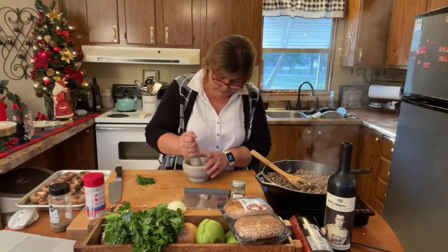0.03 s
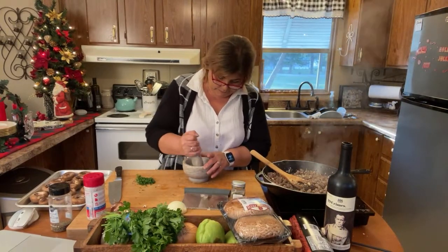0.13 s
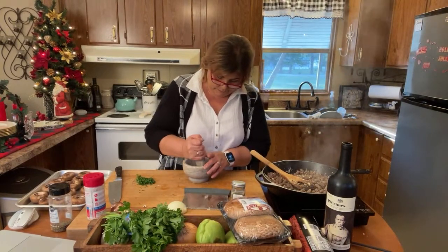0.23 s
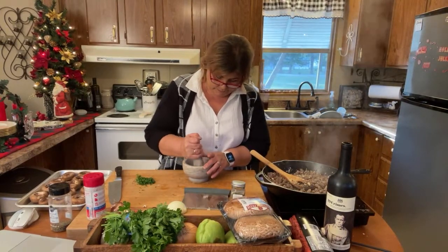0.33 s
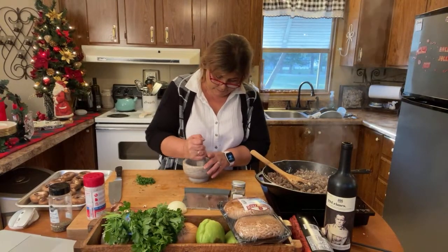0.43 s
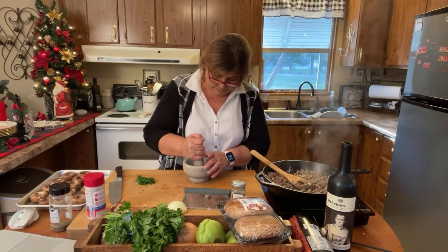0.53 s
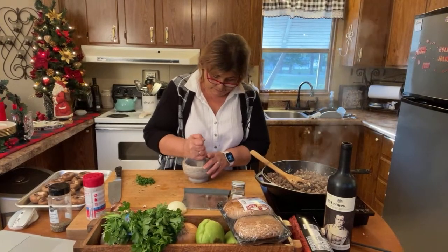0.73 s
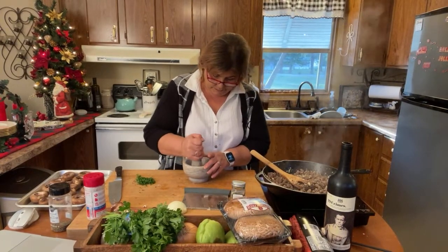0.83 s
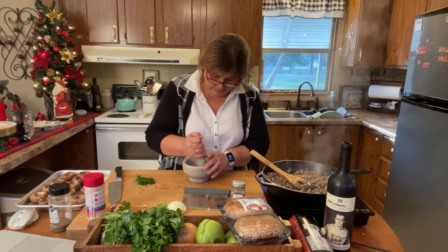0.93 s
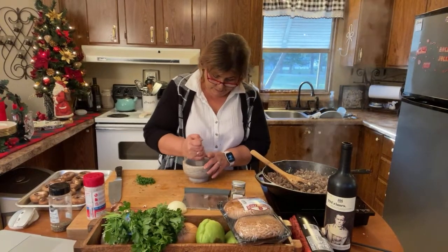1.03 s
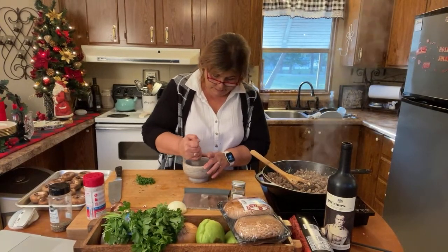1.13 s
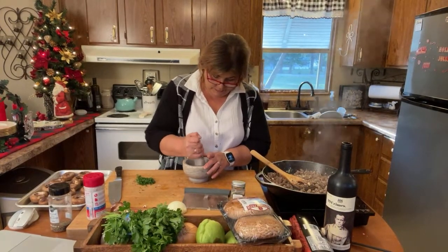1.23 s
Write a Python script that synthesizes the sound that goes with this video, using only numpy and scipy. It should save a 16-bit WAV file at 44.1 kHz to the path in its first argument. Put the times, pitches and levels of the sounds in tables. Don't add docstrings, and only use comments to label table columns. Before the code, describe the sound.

Four hard pestle knocks in a stone mortar on a wooden board, over faint kitchen hiss

```python
import sys
import numpy as np
from scipy import signal
from scipy.fft import rfft, irfft
from scipy.io import wavfile
from scipy.ndimage import uniform_filter1d

SR = 44100
rng = np.random.default_rng(int(sys.argv[2]) if len(sys.argv) > 2 else 0)


def wav_out(sig):
    wavfile.write(sys.argv[1], SR, np.round(np.clip(np.atleast_2d(sig).T, -1, 1) * 32767).astype(np.int16))


def volts_from_decibels(level):
    exponent = np.asarray(level, float) / 20
    return 10 ** exponent


N = 57330
BLOW_SAMPLES = 8000


def evened(x):
    return x / np.sqrt(np.mean(x ** 2) + 1e-20)


def read(points, hz):
    f, value = np.transpose(points)
    return np.interp(np.log(hz + 1), np.log(f + 1), value)


def add(mix, s, sound):
    part = mix[round(s * SR):][:len(sound)]
    part += sound[:len(part)]


def colour(x, points):
    gain = volts_from_decibels(read(points, np.fft.rfftfreq(len(x), 1 / SR)))
    return irfft(rfft(x) * gain, len(x))


def hiss():
    # (frequency [Hz], density [dB per Hz])
    hiss_spectrum = [(15, -52), (25, -7.5), (65, 6.5), (259, -8.5), (378, -7), (687, -8), (979, -7.5),
                     (13300, -27.5), (16500, -37)]
    frames = N // 256 + 5
    hz = np.fft.rfftfreq(1024, 1 / SR)
    real, imag, patches = rng.standard_normal((frames, 513, 3)).T
    patches = uniform_filter1d(patches, size=12, axis=0)
    patches_db = evened(uniform_filter1d(patches, size=12, axis=1))
    z = (real + 1j * imag) * volts_from_decibels(read(hiss_spectrum, hz)[:, None] + patches_db)
    return volts_from_decibels(-44) * evened(signal.istft(z, nperseg=1024, noverlap=768)[1][:N])


def hum():
    # (frequency [Hz], bandwidth [Hz], level [dB])
    hum_bands = [(80.6, 8.6, -49), (150, 52, -50), (241.7, 34, -55.5)]
    f = np.fft.rfftfreq(N, 1 / SR)
    out = np.zeros(N)
    for mid_hz, width_hz, db in hum_bands:
        resonance = 1 / (1 + (2 * (f - mid_hz) / width_hz) ** 2)
        out += volts_from_decibels(db) * evened(irfft(rfft(rng.standard_normal(N)) * resonance, N))
    return out


def contact_push(force_db, contact_ms):
    u = np.arange(300) / SR * 1000 / contact_ms
    push = u ** 11 * np.exp(-u * 6 * np.pi)
    return volts_from_decibels(force_db) * push / push.sum()


def ring(modes, spot):
    t = np.arange(BLOW_SAMPLES) / SR
    hz, db, t60 = np.transpose(modes)[:, :, None]
    spot_db = spot[:len(modes), None]
    swell = 1 - np.exp(-t * hz / 0.8)
    decay = volts_from_decibels(db + spot_db - 60 * t / t60)
    return (swell * decay * np.sin(2 * np.pi * hz * t)).sum(0)


def wood_thump(counter_db, spot):
    # (frequency [Hz], level [dB], t60 [s])
    board = [(224.3, -8, 0.064), (303.6, -8.5, 0.057), (401, -6, 0.09), (464, -6, .06), (555, -19, 0.023),
             (564.3, 5, 0.028), (601, -3, 0.095), (760, -5, 0.014), (902, -5.5, 0.053), (1240, 4, 0.017)]
    # (frequency [Hz], level [dB], t60 [s])
    seat = [(1570, 4, 0.019), (1760, -2, 0.03), (1892, 4, .016), (2426, 1, 0.024), (2560, 8, 0.0064),
            (3130, -59, 0.034), (3325, -6, 0.036), (3770, -26, 0.01)]
    # (frequency [Hz], level [dB], t60 [s])
    cabinet = [(148, -7.5, 0.15)]
    # (frequency [Hz], level [dB], t60 [s])
    bend = [(195.4, -20.5, 0.26), (216.4, -12, 0.15)]
    wood = volts_from_decibels(0.5) * ring(board, spot[0]) + volts_from_decibels(-1) * ring(seat, spot[1])
    return wood + volts_from_decibels(counter_db) * ring(cabinet, spot[0]) + volts_from_decibels(-counter_db) * ring(bend, spot[1])


def bowl_ring(spot):
    # (frequency [Hz], level [dB], t60 [s])
    bowl = [(5066, -2, 0.13), (5119, 1.5, 0.17), (4960, -8.5, 0.15), (5500, -40, 0.012),
            (10030, -26.5, 0.059), (10470, -17.5, 0.032), (13250, -48, .08)]
    return volts_from_decibels(-9.5) * ring(bowl, spot[2])


def causal(points):
    log_gain = np.log(volts_from_decibels(read(points, abs(np.fft.fftfreq(4096, 1 / SR)))))
    return np.fft.ifft(np.exp(np.conj(signal.hilbert(log_gain)))).real[:2048]


def crack_and_snap(grit):
    # (frequency [Hz], level [dB])
    crack_spectrum = [(100, -7), (300, 3.5), (600, 7.5), (1100, 0.5), (2200, 1.5), (3500, -8.5),
                      (4600, -12), (7000, -39)]
    crack_db, crack_t60, rise_s = 2.5, 0.033, 0.00015
    t = np.arange(BLOW_SAMPLES) / SR
    fade = np.minimum(t / rise_s, 1) * volts_from_decibels(crack_db - 60 * t / crack_t60)
    crack = fade * evened(colour(grit, crack_spectrum))
    snap = volts_from_decibels(26.5) * np.pad(causal(crack_spectrum), (0, BLOW_SAMPLES - 2048))
    return crack, snap


def blow(force_db, contact_ms, bowl_db, counter_db, spot, grit):
    push = contact_push(force_db, contact_ms)
    sources = [wood_thump(counter_db, spot), *crack_and_snap(grit)]
    wood, crack, snap = signal.fftconvolve(sources, push[None], axes=1)[:, :BLOW_SAMPLES]
    bowl = volts_from_decibels(force_db + bowl_db) * bowl_ring(spot)
    near = wood + crack + bowl
    far = volts_from_decibels(-14) * wood + snap + volts_from_decibels(-7) * bowl
    return near, far


def leaves():
    # (time [s], level [dB])
    crumbling = [
        (0.225, -41),
        (0.461, -39),
        (0.701, -39),
        (.991, -41.5),
    ]
    # (frequency [Hz], level [dB])
    leaf_spectrum = [(3000, -6.5), (6000, 0), (9000, -3), (11000, 3.5), (14000, -4), (16000, -9)]
    crumbs_per_s, spread_db, crunch_t60, rise_s = 7000, 2.7, 0.093, 0.0036
    size = volts_from_decibels(spread_db * rng.exponential(1, N))
    sign = rng.choice([-1., 1.], N)
    crumbs = size * sign * (rng.random(N) < crumbs_per_s / SR)
    level = np.zeros(N)
    t = np.arange(6000) / SR
    for s, db in crumbling:
        add(level, s, np.minimum(t / rise_s, 1) * volts_from_decibels(db - 60 * t / crunch_t60))
    return level * evened(colour(crumbs, leaf_spectrum))


def early_reflections():
    # (delay [s], level [dB])
    walls = [(.0028, -20), (.0043, -6.5), (.0062, -11.5), (.009, -48.5), (0.0116, -14.5)]
    early = np.zeros(1000)
    early[0] = 1
    for s, db in walls:
        early[round(s * SR)] += volts_from_decibels(db)
    return early


def reverberation():
    # (frequency [Hz], t60 [s])
    decay_times = [(100, 0.16), (250, 0.5), (600, 0.18), (1500, 0.29), (3000, 0.27), (5000, 0.29),
                   (10000, 0.087)]
    # (frequency [Hz], room level [dB])
    room_spectrum = [(100, 4), (300, -2.5), (1000, 1.5), (3000, -2.5), (5000, -1), (12000, -3)]
    even_hz, build_s, start, spacing = 32, 0.007, 360, 20
    taps = np.zeros(SR // 2)
    at = np.arange(start, len(taps) - spacing, spacing)
    taps[at + rng.integers(0, spacing, len(at))] = rng.choice([-1., 1.], len(at))
    hz, t, z = signal.stft(taps, SR, nperseg=256)
    fade = volts_from_decibels(-60 * t / read(decay_times, hz)[:, None])
    fade = fade / np.linalg.norm(fade, axis=1)[:, None]
    tail = signal.istft(z * fade, SR, nperseg=256)[1]
    z = rfft(tail)
    width = max(round(even_hz * len(tail) / SR), 1)
    z = z / np.sqrt(uniform_filter1d(abs(z) ** 2, size=width) + 1e-12)
    i = np.arange(len(tail))
    build = np.clip((i - start) / SR / build_s, 0, 1)
    tail = irfft(z, len(tail)) * build * (i < 0.45 * SR)
    return colour(tail / np.linalg.norm(tail), room_spectrum)


def kitchen(near, far):
    return signal.fftconvolve(near, early_reflections())[:N] + signal.fftconvolve(far, reverberation())[:N]


def scene():
    # (time [s], force [dB], contact [ms], bowl level [dB], counter level [dB])
    blows = [(0.2233, -12, .85, -47, -6.5), (.2261, -15, 1.54, -41, 5), (.455, -37, 0.23, -21, 5),
             (.4583, -9.5, 0.26, -3, -2), (.462, -30.5, 0.24, 14, 17.5), (.6974, -10, 0.18, 3, 6.5),
             (.701, -16, 0.36, -33, 5), (.986, -38.5, 0.16, 0, -29.5), (.9886, -11, 0.21, 3.5, -2),
             (.9922, -12, 0.47, -35, 5), (0.6885, -46, 0.12, 5, -4)]
    spots = np.clip(rng.standard_normal((len(blows), 3, 14)), -2, 2)
    grits = rng.standard_normal((len(blows), BLOW_SAMPLES))
    near = leaves()
    far = near.copy()
    for (s, *how), spot, grit in zip(blows, spots, grits):
        direct, spread = blow(*how, spot, grit)
        add(near, s, direct)
        add(far, s, spread)
    return (kitchen(near, far) + hiss() + hum())[None]


def roll_off(x):
    return signal.sosfilt(signal.butter(12, 16810, fs=SR, output="sos"), x)


def record(dry):
    low_cut_hz, limit_db, edge_hz = 91, 1.8, 15700
    thin = signal.sosfilt(signal.butter(4, low_cut_hz, "high", fs=SR, output="sos"), dry)
    soft = thin / (1 + (thin / volts_from_decibels(limit_db)) ** 4) ** 0.25
    low_pass = signal.firwin(511, edge_hz, window=("kaiser", 9), fs=SR)
    mix = signal.oaconvolve(soft, low_pass[None], "same")
    return roll_off(mix)


dry = scene()
out = record(dry)
wav_out(out)
```